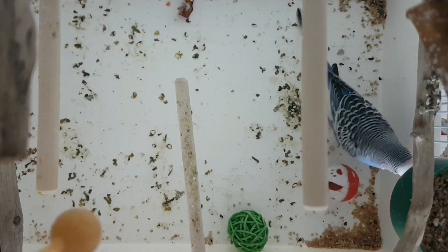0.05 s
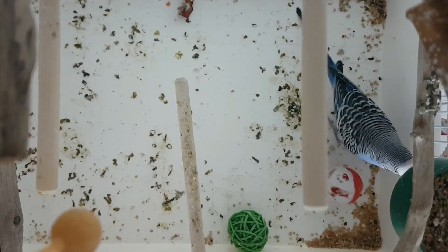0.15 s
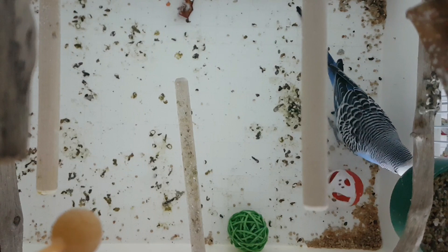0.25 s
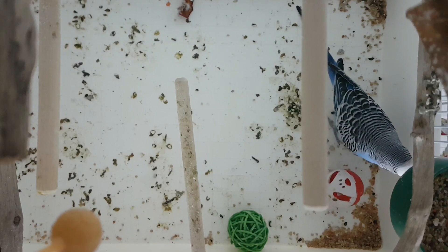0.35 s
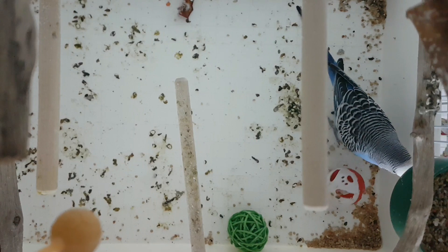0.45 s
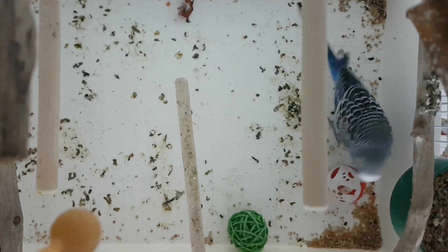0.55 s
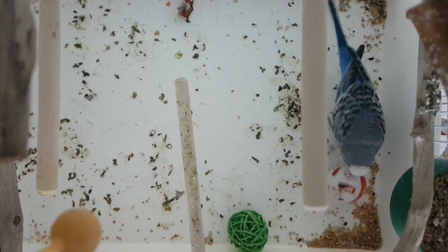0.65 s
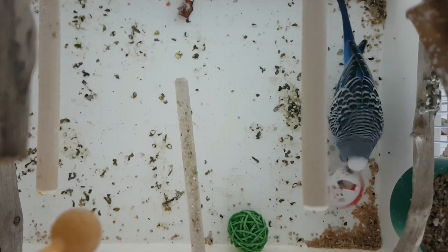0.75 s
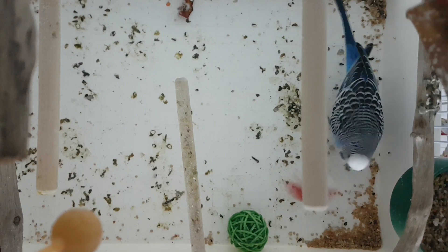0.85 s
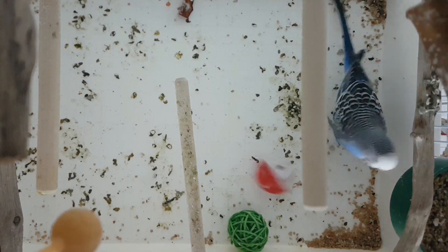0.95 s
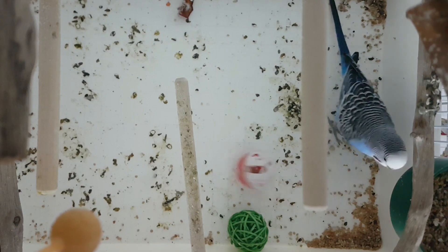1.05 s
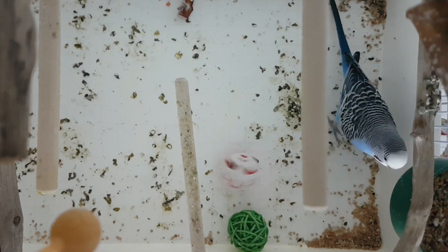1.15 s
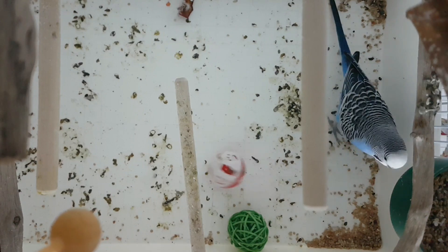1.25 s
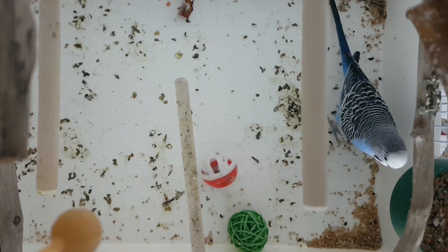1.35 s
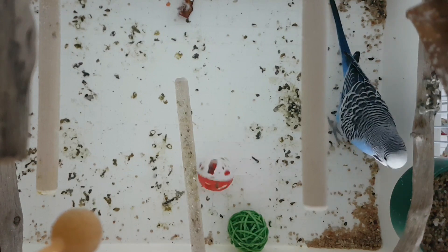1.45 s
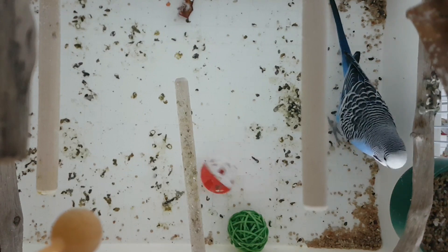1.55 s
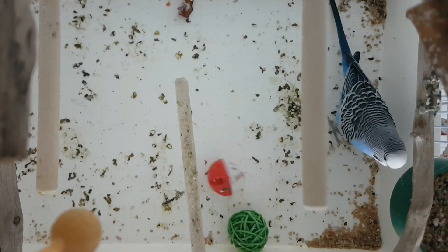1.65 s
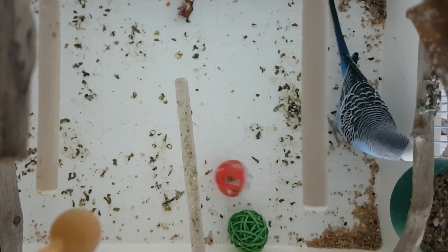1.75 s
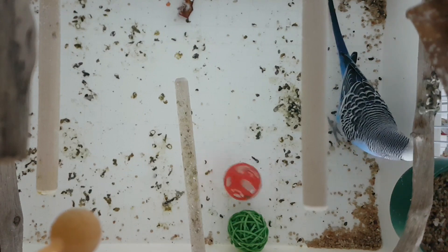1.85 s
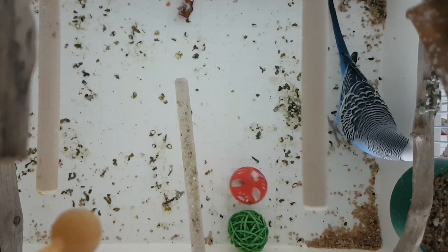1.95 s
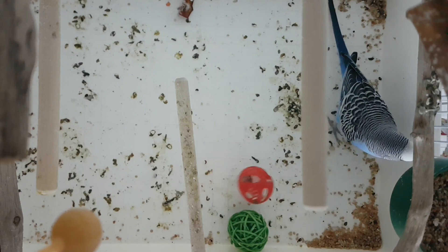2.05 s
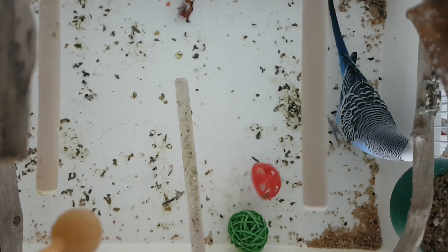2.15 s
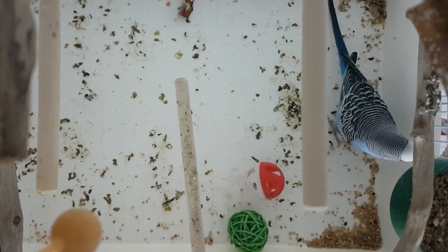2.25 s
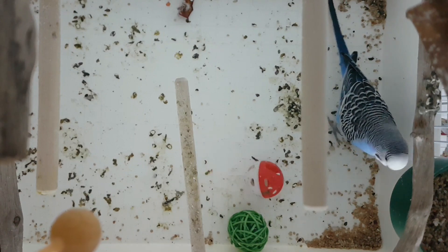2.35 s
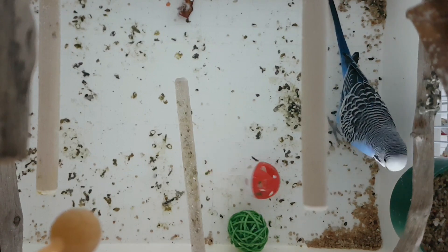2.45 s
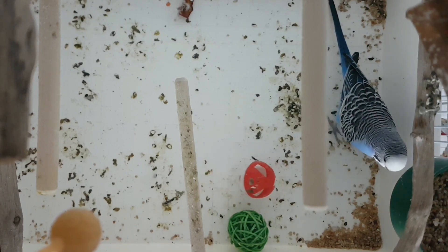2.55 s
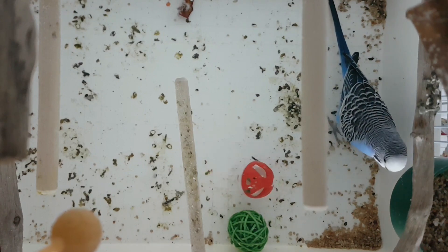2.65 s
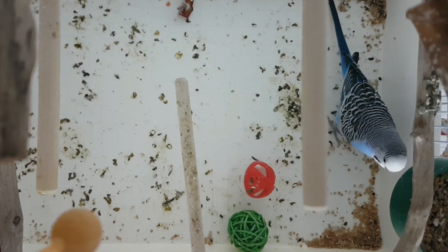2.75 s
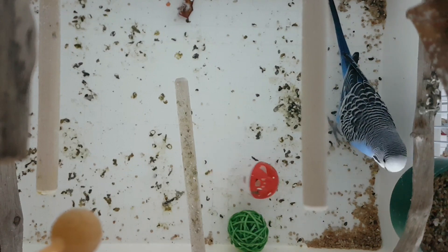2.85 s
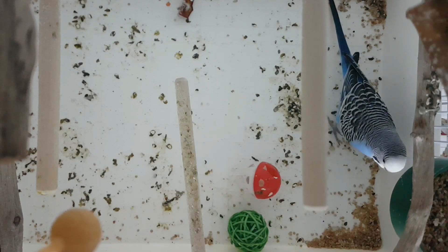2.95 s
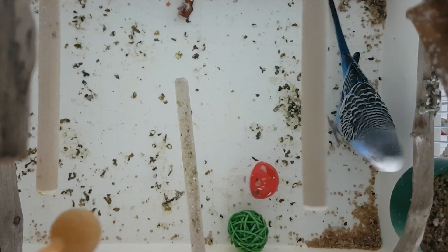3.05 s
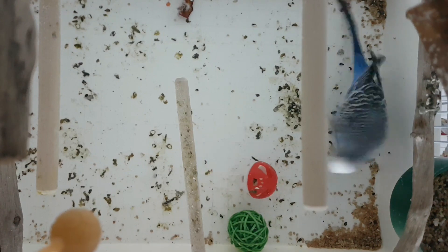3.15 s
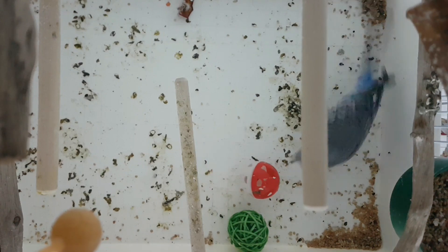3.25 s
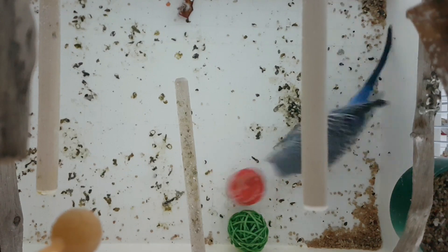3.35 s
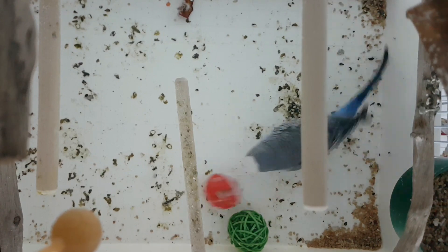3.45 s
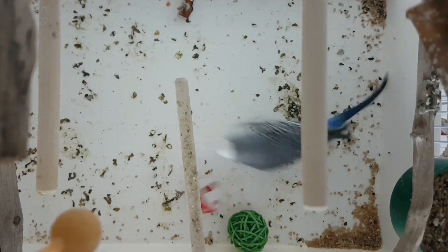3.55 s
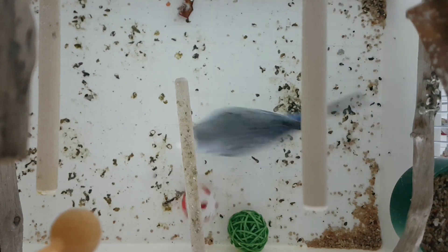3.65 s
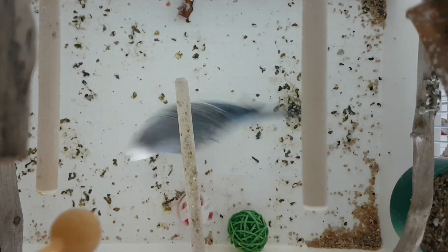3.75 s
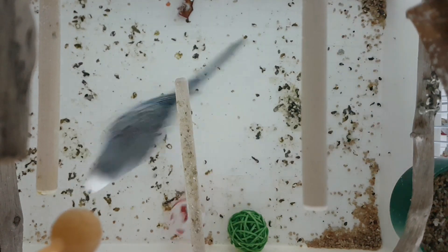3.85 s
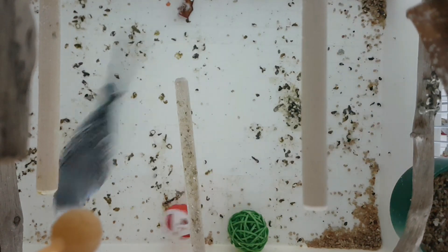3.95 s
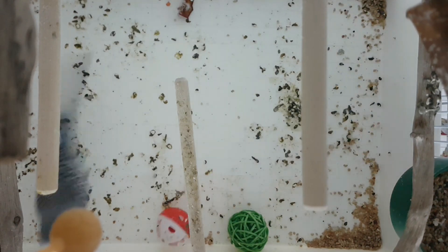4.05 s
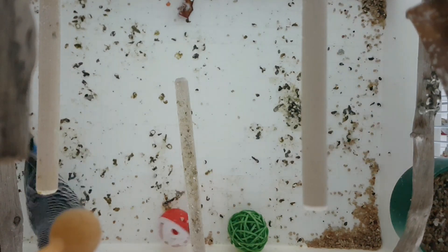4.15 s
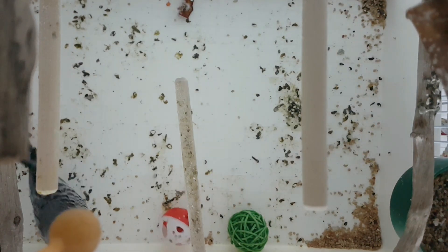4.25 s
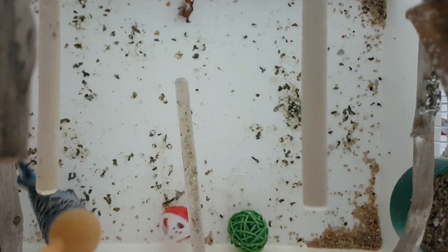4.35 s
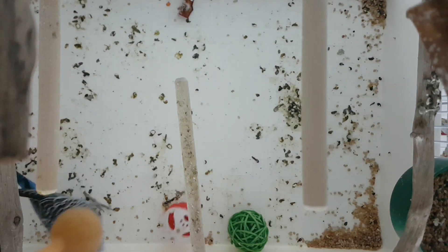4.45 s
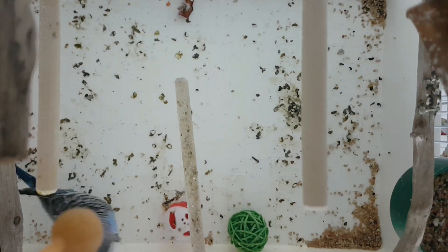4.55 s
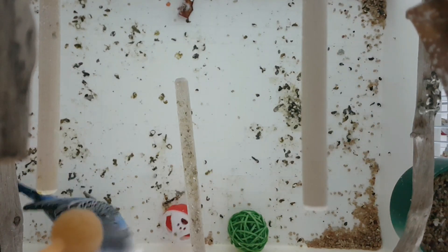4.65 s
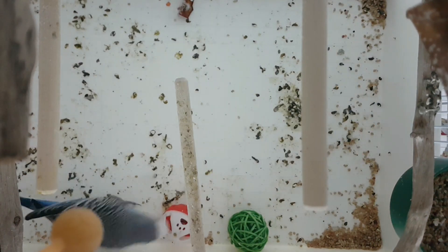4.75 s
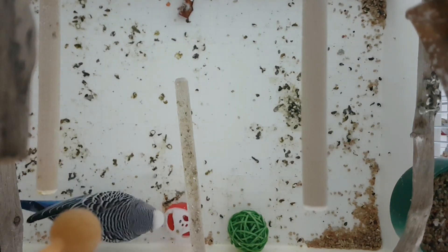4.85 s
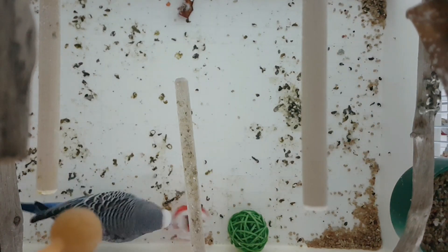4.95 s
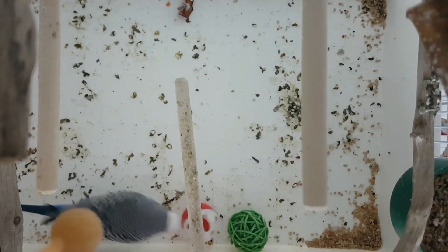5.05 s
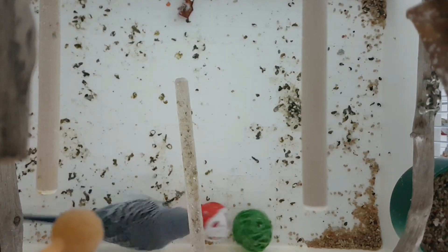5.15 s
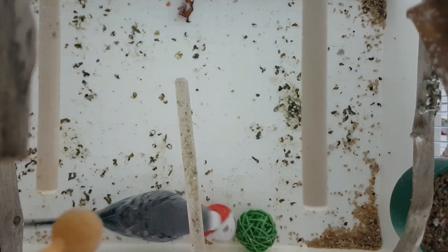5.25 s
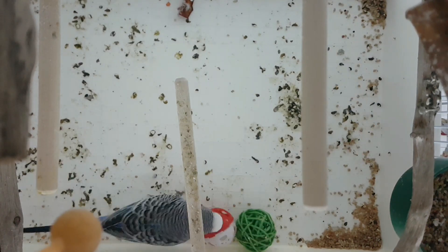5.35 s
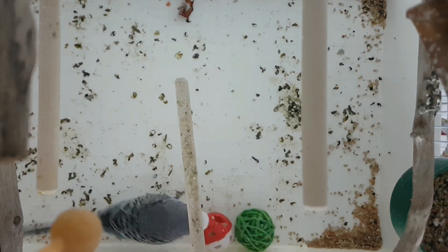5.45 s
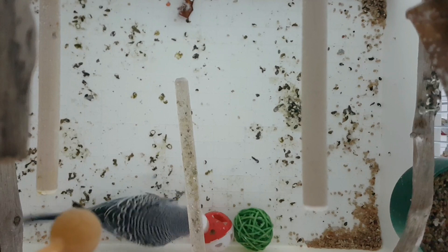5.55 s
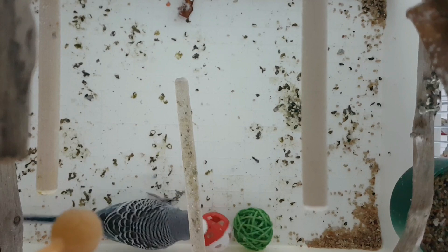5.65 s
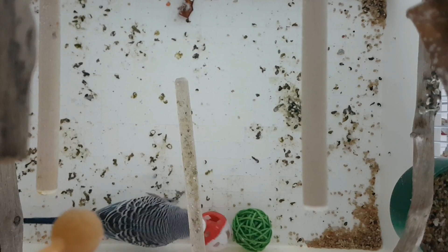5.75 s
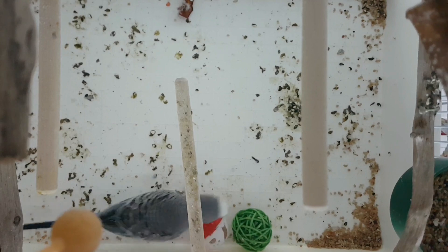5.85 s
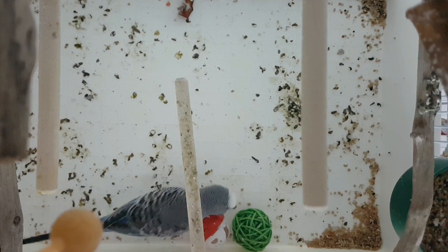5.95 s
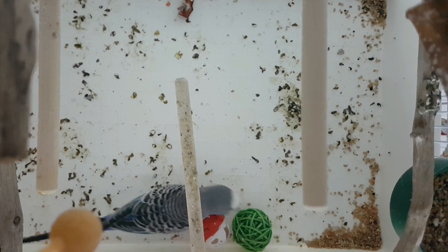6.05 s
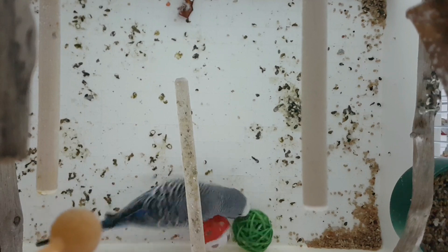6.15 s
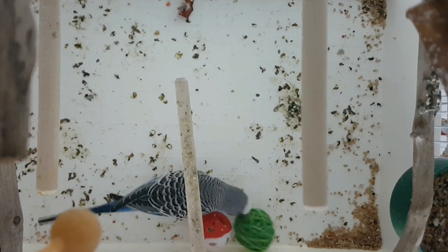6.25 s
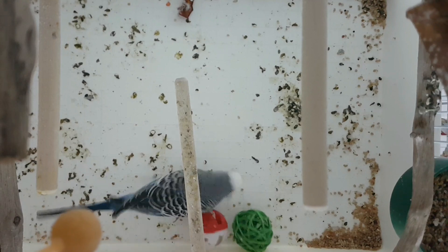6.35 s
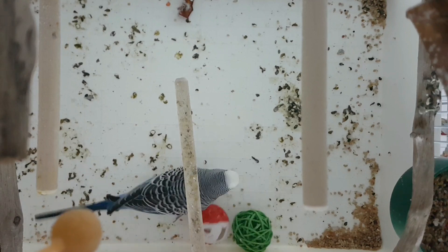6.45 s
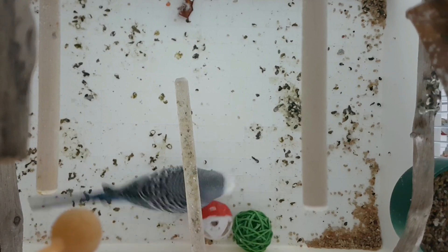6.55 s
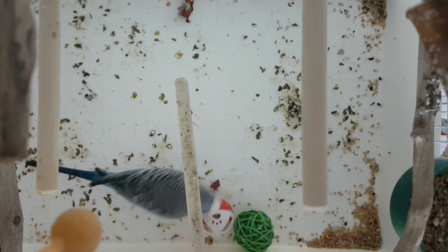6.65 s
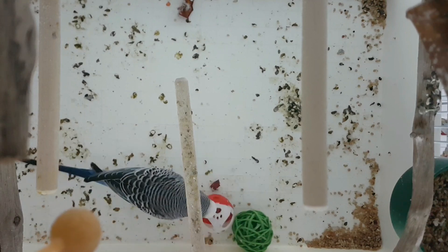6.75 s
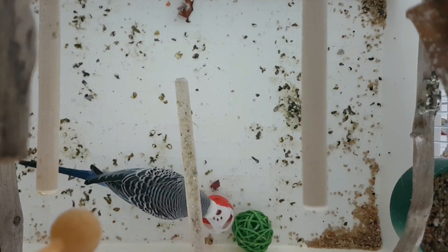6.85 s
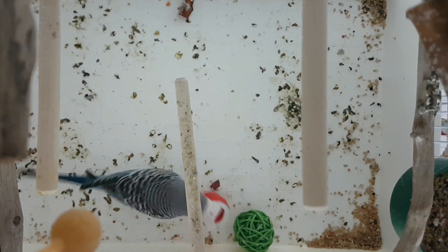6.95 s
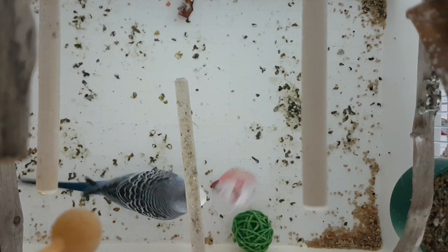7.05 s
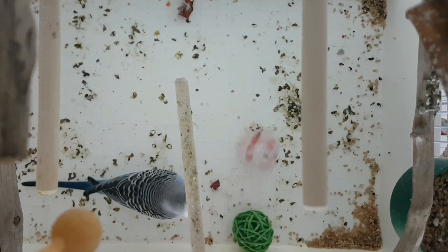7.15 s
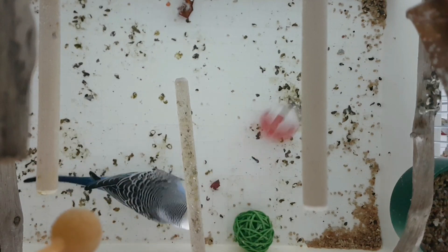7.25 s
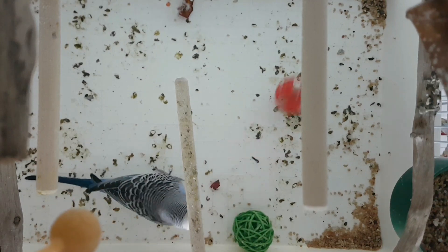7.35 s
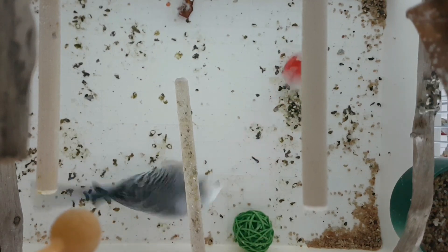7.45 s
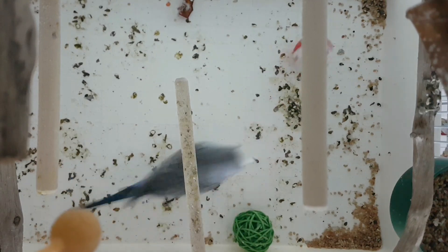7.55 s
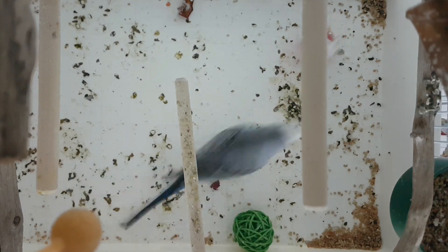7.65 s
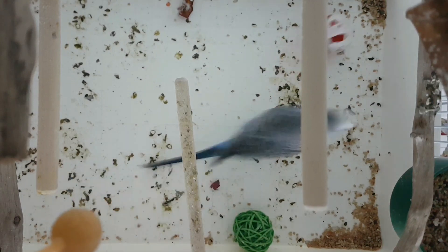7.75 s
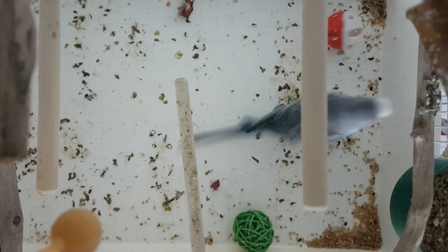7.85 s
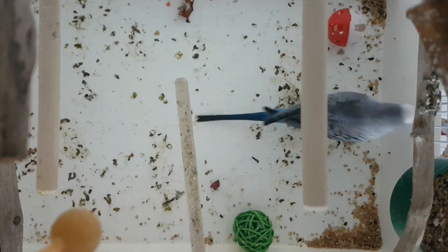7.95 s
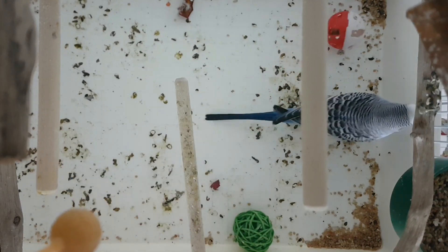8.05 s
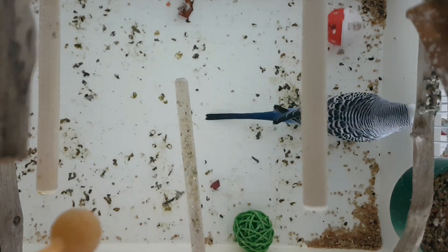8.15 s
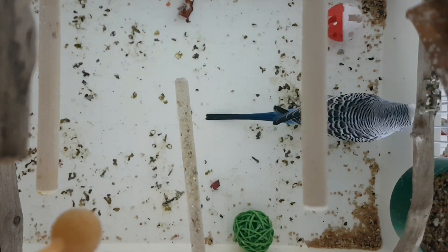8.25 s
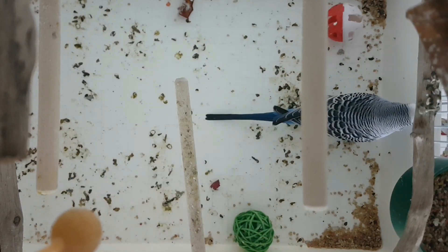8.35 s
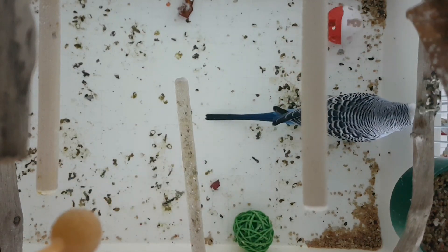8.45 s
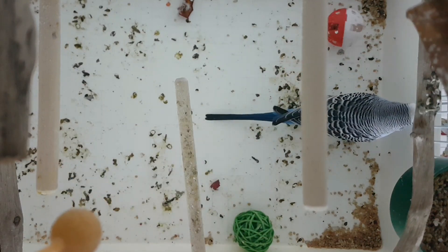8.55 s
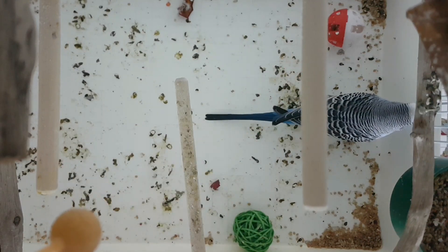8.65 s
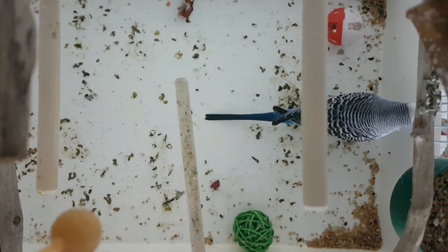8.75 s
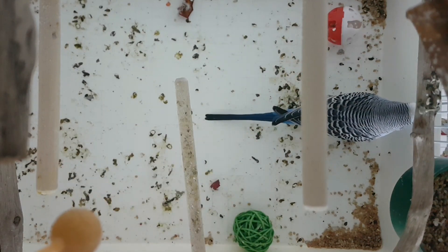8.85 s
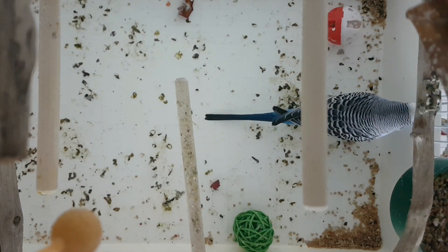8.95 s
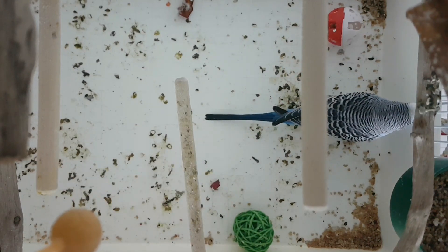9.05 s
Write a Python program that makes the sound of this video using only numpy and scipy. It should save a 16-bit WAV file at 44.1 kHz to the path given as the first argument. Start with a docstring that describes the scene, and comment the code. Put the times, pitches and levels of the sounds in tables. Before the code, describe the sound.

In a quiet small room, a budgie plays on a plastic cage tray. A hard hollow clack and thud of a thrown ball come early, followed by a rattling roll with faint bell tinkles. Soft footfalls, pecks and crackling husks continue, with short warbles between. A second heavy toss bounces away just after seven seconds, then a raspy squawk, and things settle to light taps. Close stereo microphone.

```python
"""Budgie with a bell ball

A budgie plays on the seed-strewn plastic tray of its cage, in a small room. It tosses a plastic ball twice.
Each touch layers a flexing tray thud, a hollow shell clack and a bright noise tick; the bell is ringing modes.
Random taps and crackles make the rolling, scratching and husks underfoot. Gliding tones, roughened by noise,
make three warbles, a few chirps and one short squawk. Soft filtered noise is the quiet of the room.
"""
import sys
import numpy as np
from scipy import signal
from scipy.fft import rfft, irfft
from scipy.io import wavfile

SR = 44100
rng = np.random.default_rng(int(sys.argv[2]) if len(sys.argv) > 2 else 0)


def generate_wav(signal):
    """Clip the signal to [-1, 1] and save it as 16-bit WAV at the path in sys.argv[1]."""
    frames = np.transpose(np.atleast_2d(signal))
    scaled = np.clip(frames, -1, 1) * 32767
    pcm = np.round(scaled).astype(np.int16)
    wavfile.write(sys.argv[1], SR, pcm)


N = 401310  # length in samples

# All table levels are mix settings, trimmed again by each layer's own level.
# Quiet of the room, spectrum: [f/Hz, relative density level/dB]
ROOM_TONE_SPECTRUM = [(25,-11),(55,3),(120,-0.5),(220,3.5),(480,-6.5),(800,-10),(2000,-12.5),(4000,-21),(9000,-29.5),(15500,-24.5)]
# Decay of the room: [f/Hz, time to lose 60 dB t60/s]
ROOM_DECAY = [(150,0.55),(400,0.44),(1000,0.33),(2800,0.31),(7000,0.32),(15000,0.24)]
# Left-right likeness of diffuse sound: [f/Hz, likeness, 0 unrelated to 1 identical]
EAR_LIKENESS = [(60,0),(250,0.62),(500,0.32),(1000,0.051),(3000,0),(12000,0)]
# Bouts of rolling and scratching:
# [full from t/s, hold length/s, patter level/dB, husk crackle level/dB, cage rumble level/dB]
ROLLING_BOUTS = [(0, 0.035, -48, -55.5, -69), (0.998, 0.2, -35.5, -60, -50),
                 (1.252, 0.14, -42.5, -56.5, -54), (1.595, 0.37, -54.5, -63, -64.5),
                 (2.153, 0.19, -47.5, -63.5, -62.5), (2.49, 0.18, -50.5, -67, -71),
                 (2.86, .08, -51.5, -64, -59), (3.337, 0.72, -46.5, -50, -54),
                 (4.292, 0.38, -59, -63.5, -71), (5.11, 0.48, -48.5, -52.5, -61.5),
                 (6.08, 0.27, -54.5, -58.5, -58), (6.68, 0.18, -52.5, -58.5, -58),
                 (7.22, 0.46, -45.5, -45, -57), (7.59, 0.22, -42, -52.5, -60),
                 (7.973, 0.19, -46, -62.5, -65), (8.399, 0.036, -53.5, -74.5, -72),
                 (8.773, 0.15, -52, -68, -63.5)]
# The bird is never quite still: [patter level/dB, crackle level/dB, rumble level/dB]
IDLE_LEVELS = (-66, -67, -78)
# Seed husks, spectrum: [f/Hz, relative level/dB]
HUSK_SPECTRUM = [(500,-0.5),(1000,-1),(2000,-4),(4000,-10),(8000,-17.5),(16000,-20)]
# Ringing modes of the tray: [f/Hz, relative level/dB, t60/s]
TRAY_MODES = [(119.7,-16.5,0.99),(222.1,0,0.51),(283.3,-9.5,0.64),(347.8,7,0.16),(490,8,0.2),(514,12,0.22),(596,-3.5,0.5),(817,-0.5,0.36),(1050,-15,0.33),(966,-6,0.18),(967,-3,0.08)]
# Higher flexing modes of the floor: [multiple of the lowest mode]
FLEX_RATIOS = [1.56, 2.42, 3]
# Hollow plastic, spectrum of its knock: [f/Hz, relative level/dB]
CLACK_SPECTRUM = [(40,-50.5),(150,-25),(400,-4.5),(650,-3),(1050,0),(1400,-5),(2000,-8.5),(2800,-14),(4000,-22),(8000,-48.5)]
# Ringing modes of the hollow ball: [f/Hz, relative level/dB]
SHELL_MODES = [(1243,-14.5),(1391,-2),(1560,-5),(1965,-1),(2277,-15),(2443,-17),(3200,9)]
# Hard edge of a contact, spectrum: [f/Hz, relative level/dB]
TICK_SPECTRUM = [(60,-49.5),(1500,-7.5),(3200,-0.5),(4300,2.5),(6000,1),(8000,3),(9500,-6),(12000,0.5),(15500,-3.5)]
# Beak taps on ball or floor: [t/s, clack level/dB]
BEAK_TAPS = [(.004, -50.5), (0.491, -45.5), (.618, -41), (1.625, -49), (2.284, -46.5), (2.494, -52.5),
             (2.628, -46), (3.034, -54.5), (3.188, -47.5), (3.473, -41.5), (3.861, -46), (4.28, -47),
             (4.445, -48), (4.753, -46.5), (5.826, -48), (5.914, -50), (6.147, -42.5), (6.214, -45.5),
             (6.321, -48.5), (6.598, -47.5), (6.692, -40), (8.148, -53), (9.038, -41), (9.067, -44)]
# Soft bumps of the feet and of the rolling ball: [t/s, thud level/dB]
SOFT_BUMPS = [(.123, -45), (1.25, -37.5), (1.287, -41), (1.555, -43), (1.864, -41), (2.09, -38.5),
              (2.357, -43), (2.424, -41), (3.635, -26), (3.794, -29.5), (4.001, -36.5), (4.172, -39),
              (4.293, -41), (4.43, -41), (4.491, -36), (4.535, -40), (4.585, -37), (4.66, -38),
              (4.916, -39.5), (4.964, -38), (5, -38), (5.462, -35), (5.839, -39), (6.371, -41.5),
              (6.626, -41.5), (6.756, -43), (6.851, -40), (6.897, -26.5), (7.196, -21.5)]
# The ball is struck or lands: [t/s, thud level/dB, shell clack level/dB, tick level/dB, thud pitch f/Hz]
BALL_KNOCKS = [(.59, -33.5, -40.5, -42.5, 457), (.909, -10, -17, -25, 304), (.949, -33, -20.5, -34, 380),
               (.961, -14, -28.5, -31.5, 412), (1.071, -28.5, -42, -49, 340),
               (1.125, -35, -42.5, -49.5, 325), (1.212, -31, -43.5, -56, 304),
               (1.374, -33, -38.5, -46.5, 325), (1.402, -44.5, -36.5, -40, 334),
               (1.585, -39, -41, -48.5, 354), (1.75, -35, -41.5, -53, 385), (2.184, -42, -38.5, -54, 325),
               (2.216, -34, -45, -50, 315), (3.272, -45.5, -43.5, -57, 454), (3.32, -31.5, -45, -41, 268),
               (3.351, -32, -36.5, -52, 320), (3.404, -26, -38, -48, 335), (3.501, -32.5, -43, -40, 293),
               (3.551, -35.5, -32, -42.5, 364), (3.937, -33.5, -43.5, -49, 384),
               (3.974, -35, -32, -45, 310), (4.904, -47.5, -52, -49.5, 370),
               (5.112, -30.5, -41.5, -42.5, 345), (5.145, -34.5, -52, -48, 406),
               (5.204, -31.5, -46, -40, 362), (5.218, -30, -40.5, -47, 365), (5.407, -48, -46, -45.5, 284),
               (5.593, -27.5, -34, -38.5, 363), (5.618, -48, -50, -45.5, 350),
               (6.712, -35.5, -36, -53.5, 444), (6.875, -30.5, -39.5, -43, 366),
               (7.135, -8.5, -26.5, -24.5, 314), (7.172, -26, -30.5, -36.5, 310),
               (7.265, -27.5, -35, -44, 292), (7.315, -36, -60, -39.5, 320),
               (7.338, -21.5, -46.5, -44.5, 259), (7.412, -16.5, -32.5, -46, 252),
               (7.435, -24, -42, -40, 222.5), (7.619, -29, -42, -71, 457), (7.664, -30, -42, -45.5, 230),
               (7.82, -39, -42.5, -50.5, 430), (7.96, -43, -49.5, -52.5, 492), (8.116, -43, -67, -57, 453)]
# Chirps and the two-part squawk: [t/s, length/s, first f/Hz, last f/Hz, level/dB, rasp 0-1]
SINGLE_CALLS = [(.646, 0.029, 2960, 3360, -52, 0.56), (2.862, 0.077, 2575, 2340, -66, 0.6),
                (3.669, 0.033, 2990, 1620, -41.5, 0.78), (4.575, .021, 2780, 2400, -55.5, 0.06),
                (6.05, .027, 1874, 1630, -54, 0.4), (7.674, 0.022, 2007, 2715, -32.5, 1),
                (7.692, .026, 2382, 3176, -25, 1)]
# Warbles: [t/s, level/dB, accent level/dB, stretch of the motif in time]
WARBLE_PHRASES = [(0.662, -35, 8, 0.99), (3.698, -36, 10.5, .93), (5.256, -28, -6, 1.08)]
# Four notes of each warble, before the stretch:
# [delay t/s, length/s, first f/Hz, last f/Hz, relative level/dB, rasp 0-1, share of the accent 0-1]
WARBLE_NOTES = [(0, .042, 1689, 1218, -1, 0.26, 0.19), (.041, .034, 2166, 1940, -3, 0.33, 1),
                (0.069, .042, 3600, 2440, -8, .17, 0), (0.099, .036, 1483, 1000, -4.5, 0.51, 0.45)]
# The pellet starts bouncing in the bell: [t/s, level/dB]
BELL_STRIKES = [(.768, -48.5), (1.073, -47), (1.1, -53), (1.365, -60), (1.606, -53.5), (1.929, -60),
                (3.499, -41), (3.575, -47.5), (3.935, -49), (5.239, -43), (6.719, -59.5), (7.526, -47.5),
                (7.591, -43), (7.762, -41), (8.04, -54.5), (8.114, -57)]
# Ringing modes of the bell: [f/Hz, relative level/dB, t60/s]
BELL_MODES = [(4306,-18.5,.2),(4787,-9.5,0.15),(4820,-9.5,0.17),(7600,-11.5,0.16),(9800,-10,0.093),(10830,-10,0.081),(12888,-12.5,.12),(14460,-24.5,.12)]

ROOM_TONE_DB = -60.5  # rms
TOP_HZ = 16100  # the treble ends here
ATTACK = int(.016 * SR)  # samples over which a blow's level is set
AGE = np.arange(int(.55 * SR)) / SR  # seconds since a sound began
BOUT_ATTACK_S, BOUT_T60_S = 0.1, .55
BUMP_HZ, BUMP_CLACK_DB, BUMP_TICK_DB = 350, -19, -38.5  # relative to the thud: a bump is nearly all thud
PECK_HZ, PECK_THUD_DB, PECK_TICK_DB = 345, 1.5, -21.5  # relative to the clack: the floor gives a little
SPOT_OCTAVES = .14  # floor pitch varies this far up or down from spot to spot
REBOUND_S, REBOUND_DB = .01, -15  # typical delay and relative level of a hard contact's one chatter
GLIDE_POWER = 1.924  # above 1, a note lingers near its first pitch, then slides ever faster


def from_db(db):
    """Decibels to gain."""
    return 10 ** (np.asarray(db) / 20)


def fade(t60):
    """An exponential decay that loses 60 dB in t60 seconds."""
    return np.exp(-np.log(1000) * AGE / t60)


def at_hz(points, hz):
    """Read a table on a log-frequency axis."""
    points = np.array(points)
    return np.interp(np.log(hz), np.log(points[:, 0]), points[:, 1])


def rms_one(x):
    """Scale to an rms of 1."""
    return x / np.sqrt(np.mean(x ** 2) + 1e-20)


def unit_energy(x):
    """Scale each channel to an energy of 1."""
    return x / np.sqrt(np.sum(x ** 2, axis=-1, keepdims=True) + 1e-20)


def pan(db):
    """Channel gains for a left-minus-right level; negative leans right."""
    return from_db(np.array([[db], [-db]]) / 2)


def add(out, s, sound):
    """Mix a sound in at s seconds."""
    i = max(0, int(s * SR))
    part = sound[..., :max(0, N - i)]
    out[..., i:i + part.shape[-1]] += part


def through(x, response):
    """Pass a sound through an impulse response."""
    return signal.fftconvolve(np.atleast_2d(x), response, axes=-1)[:, :x.shape[-1]]


def colour(x, spectrum, size=2048):
    """Filter to a spectrum with minimum phase, so the energy comes as early as it can."""
    hz = np.maximum(np.fft.rfftfreq(size, 1 / SR), 1)
    cepstrum = irfft(np.log(from_db(at_hz(spectrum, hz))))
    # fold the cepstrum onto positive time
    cepstrum[1:size // 2] *= 2
    cepstrum[size // 2 + 1:] = 0
    return through(x, irfft(np.exp(rfft(cepstrum)))[None])


def diffuse(size, gain_at):
    """Stereo noise in half-octave bands, each with its own gain and left-right likeness."""
    edges = np.geomspace(22, 18000, 20)
    white, out = rng.standard_normal((2, 2, size)), 0
    for k, band in enumerate(zip(edges, edges[1:])):
        hz = np.sqrt(band[0] * band[1])
        band_pass = signal.butter(2, band, "band", fs=SR, output="sos")
        mid, side = signal.sosfilt(band_pass, white[k % 2])  # neighbouring bands use separate noise
        alike = np.clip(at_hz(EAR_LIKENESS, hz), -1, 1)
        shared = np.sqrt(1 + alike) * mid
        opposed = np.sqrt(1 - alike) * side * [[1], [-1]]
        out = out + gain_at(hz) * (shared + opposed)
    return out


def space(wet_db, build_s=0.0007):
    """Direct sound, then the reflections of cage walls and room as decaying diffuse noise."""
    tail = diffuse(len(AGE), lambda hz: fade(at_hz(ROOM_DECAY, hz)))
    tail = tail * (1 - np.exp(-AGE / build_s))
    direct = AGE == 0
    return direct + from_db(wet_db) * unit_energy(tail)


def tray_ring(ring_db, scatter_db):
    """The tray rings in decaying modes; each spot on the floor excites them differently."""
    hz, db, t60 = np.transpose(TRAY_MODES)[:, :, None]
    strength = from_db(db + ring_db + scatter_db * rng.standard_normal(db.shape))
    return np.sum(strength * fade(t60) * np.cos(2 * np.pi * hz * AGE), axis=0)


def crack(t60, grit_db, bite_s=0.00064):
    """A hard contact is a brief burst of uneven micro-impacts, partly different at each ear."""
    bursts = rng.standard_normal((3, len(AGE))) * fade(t60) * (1 - np.exp(-AGE / bite_s))
    unevenness = from_db(grit_db * rng.standard_normal(len(AGE)))
    return (0.57 * bursts[0] + bursts[1:]) * unevenness


def at_level(sound, db):
    """Set the rms level of a blow's attack."""
    return from_db(db) * sound / np.sqrt(np.mean(sound[:, :ATTACK] ** 2) + 1e-20)


def room_tone():
    """The quiet of the room is steady diffuse noise, shaped by its spectrum."""
    noise = diffuse(N, lambda hz: from_db(at_hz(ROOM_TONE_SPECTRUM, hz)))
    return from_db(ROOM_TONE_DB) * rms_one(noise)


def activity():
    """Gains of patter, crackle and rumble: each bout swells, holds and dies away."""
    t = np.arange(N) / SR
    gains = from_db(IDLE_LEVELS)[:, None]
    for s, length, *levels_db in ROLLING_BOUTS:
        swell = np.clip(1 + (t - s) / BOUT_ATTACK_S, 0, 1)
        release = from_db(-60 * np.maximum(t - s - length, 0) / BOUT_T60_S)
        gains = np.maximum(gains, from_db(levels_db)[:, None] * swell * release)
    return gains


def grains(per_s, spread_db):
    """Tiny clicks of random time, size and sign; rms 1."""
    sizes = from_db(spread_db * np.minimum(rng.exponential(1, N), 3)) * rng.choice([-1, 1], N)
    return rms_one(sizes * (rng.random(N) < per_s / SR))


def shuffle(patter_db=-2, husk_db=-4, rumble_db=-1, shell_db=-15):
    """Light taps drum on the tray, knock the ball and jog the cage while seed husks crackle."""
    patter, crackle, rumble = activity()
    soft = signal.butter(2, [220, 700], "band", fs=SR, output="sos")
    frame = signal.butter(2, [55, 130], "band", fs=SR, output="sos")
    tray = unit_energy(signal.sosfilt(soft, space(wet_db=5) + tray_ring(ring_db=-49.5, scatter_db=12.5)))
    cage = unit_energy(signal.sosfilt(frame, space(wet_db=4.5).mean(axis=0)))  # the whole cage moves as one
    shell = unit_energy(colour(space(wet_db=4.5), CLACK_SPECTRUM))
    husk = unit_energy(colour(space(wet_db=3.0), HUSK_SPECTRUM))
    taps = grains(per_s=70, spread_db=7.0)
    drumming = through(patter * taps, from_db(patter_db) * tray + from_db(shell_db) * shell)
    jolts = from_db(rumble_db) * through(rumble * taps, cage[None])
    seeds = through(crackle * grains(per_s=210, spread_db=6), husk)
    return (drumming + jolts) * pan(-0.64) + from_db(husk_db) * seeds * pan(-6.0)


def contacts():
    """Every touch as (s, thud dB, clack dB, tick dB, pitch Hz); light ones fall on random spots."""
    touches = list(BALL_KNOCKS)
    for s, db in SOFT_BUMPS:
        spot = 2 ** rng.uniform(-SPOT_OCTAVES, SPOT_OCTAVES)
        touches.append((s, db, db + BUMP_CLACK_DB, db + BUMP_TICK_DB, BUMP_HZ * spot))
    for s, db in BEAK_TAPS:
        spot = 2 ** rng.uniform(-SPOT_OCTAVES, SPOT_OCTAVES)
        touches.append((s, db + PECK_THUD_DB, db, db + PECK_TICK_DB, PECK_HZ * spot))
    return touches


def thuds(touches, flex_t60=0.039, level_db=-4.0, lag_s=.00005, upper_t60=0.024, upper_db=-5, hardening=0.43):
    """The floor flexes under each contact at a pitch set by the spot, and wakes the tray's modes."""
    out, spots = np.zeros((2, N)), [space(wet_db=0.5) for _ in range(12)]
    for k, (s, db, _, _, hz) in enumerate(touches):
        lowest = np.sin(2 * np.pi * hz * AGE) * fade(flex_t60)
        upper = np.sin(2 * np.pi * hz * np.outer(FLEX_RATIOS, AGE)).sum(axis=0) * fade(upper_t60)
        flex = lowest + from_db(upper_db + hardening * db) * upper  # harder blows drive the higher modes more
        body = spots[k % len(spots)] + tray_ring(ring_db=-49, scatter_db=4.5)
        add(out, s, at_level(through(-flex, body), db + level_db))
    out[0] = np.interp(np.arange(N) - lag_s * SR, np.arange(N), out[0])  # the tray is nearer the right ear
    return signal.sosfilt(signal.butter(2, 95, "high", fs=SR, output="sos"), out) * pan(-2.0)


def clacks(touches, level_db=-2.0, ring_db=-17, ring_t60=0.016, scatter_db=5):
    """The hollow plastic knocks briefly, with a different mix of shell modes at each touch."""
    out, plastic = np.zeros((2, N)), colour(space(wet_db=-1.86), CLACK_SPECTRUM)
    hz, mode_db = np.transpose(SHELL_MODES)
    modes = np.sin(2 * np.pi * hz[:, None] * AGE) * fade(ring_t60)
    for s, _, db, _, _ in touches:
        ring = from_db(mode_db + ring_db + scatter_db * rng.standard_normal(len(hz))) @ modes
        knock = crack(t60=0.028, grit_db=7.5) + ring
        add(out, s, at_level(through(knock, plastic), db + level_db))
    return out * pan(-5.0)


def ticks(touches, level_db=0.93, tint_db=3):
    """Claws, beak and the ball's ribs give a sharp bright edge, tinted by the point of contact."""
    out, room = np.zeros((2, N)), space(wet_db=-4.5)
    for s, _, _, db, _ in touches:
        tint = [(hz, level + tint_db * rng.standard_normal()) for hz, level in TICK_SPECTRUM]
        edge = colour(crack(t60=0.029, grit_db=2.0), tint)
        tick = at_level(through(edge, room), db + level_db)
        add(out, s + .0003, tick)
        add(out, s + REBOUND_S * rng.uniform(.6, 1.4), from_db(REBOUND_DB) * tick)
    return out * pan(-2.5)


def syllables():
    """Single calls, then every warble's motif at its own pace and accent."""
    notes = list(SINGLE_CALLS)
    for s, db, accent_db, stretch in WARBLE_PHRASES:
        for delay, length, first_hz, last_hz, note_db, rasp, share in WARBLE_NOTES:
            level_db = db + note_db + share * accent_db
            notes.append((s + delay * stretch, length * stretch, first_hz, last_hz, level_db, rasp))
    return notes


def budgie(level_db=-1, second_db=-26, third_db=-34, rasp_hz=600, rasp_bright_db=12):
    """Quick gliding whistles; a fluttering syrinx roughens them and brings out the overtones."""
    out = np.zeros(N)
    slow = signal.butter(2, rasp_hz, fs=SR, output="sos")
    for s, length, first_hz, last_hz, db, rasp in syllables():
        noise = rng.standard_normal((2, len(AGE)))
        u = np.linspace(0, 1, int(length * SR))  # progress through the note
        flutter, tremble = rms_one(signal.sosfilt(slow, noise))[:, -len(u):]
        glide = first_hz * (last_hz / first_hz) ** (u ** GLIDE_POWER)
        hz = glide * (1 + .19 * rasp * flutter)
        phase = 2 * np.pi * np.cumsum(hz) / SR
        overtones = from_db(second_db) * np.sin(2 * phase) + from_db(third_db) * np.sin(3 * phase)
        voice = np.sin(phase) + from_db(rasp_bright_db * rasp ** 2) * overtones
        voice = voice * (1 + .5 * rasp * tremble)
        add(out, s, from_db(db + level_db) * rms_one(voice) * np.sin(np.pi * u))
    return through(out, space(wet_db=-2)) * pan(-5.5)


def bell(level_db=1, bounce_s=0.0077, bounce_db=-4, scatter_db=3, count=3):
    """The loose pellet bounces in the small metal bell, a tiny click and a new mix of modes each time."""
    out = np.zeros((2, N))
    hz, mode_db, t60 = np.transpose(BELL_MODES)[:, :, None]
    modes = fade(t60) * np.sin(2 * np.pi * hz * AGE)
    for s, db in BELL_STRIKES:
        for k in range(count):
            ring = from_db(mode_db[:, 0] + scatter_db * rng.standard_normal(len(BELL_MODES))) @ modes
            click = 1.2 * np.diff(crack(t60=.012, grit_db=4), prepend=0)  # differencing brightens it
            when = s + k * bounce_s * rng.uniform(0.57, 1.9)
            add(out, when, from_db(db + level_db + k * bounce_db) * (ring + click))
    return through(out, space(wet_db=0.0)) * pan(-1.5)


def scene():
    """The play in the cage over the quiet of the room."""
    touches = contacts()
    play = shuffle() + thuds(touches) + clacks(touches) + ticks(touches)
    return room_tone() + play + budgie() + bell()


def record(dry):
    """Peaks clip at full scale, then a steep low-pass removes the top."""
    top = signal.ellip(12, .1, 80, TOP_HZ, fs=SR, output="sos")
    return signal.sosfilt(top, np.clip(dry, -1, 1))


dry = scene()
out = record(dry)
generate_wav(out)
```